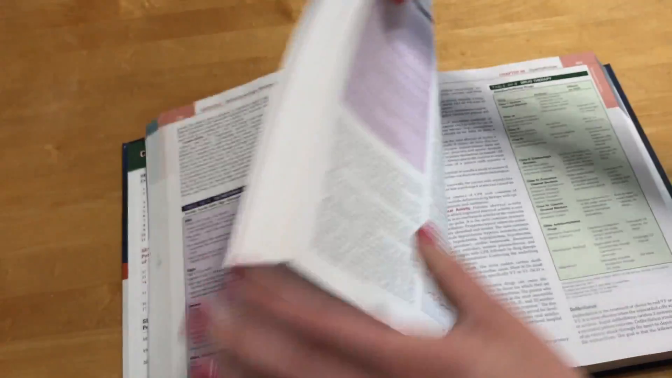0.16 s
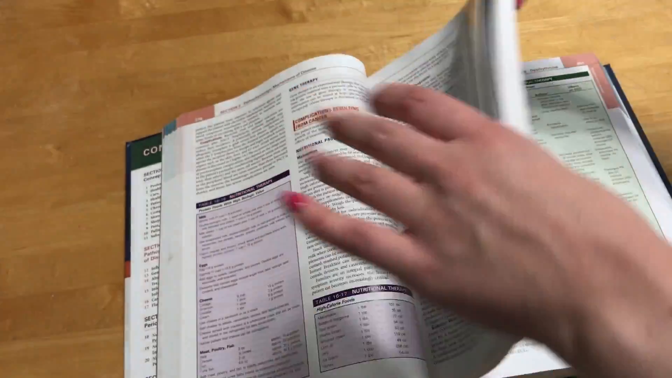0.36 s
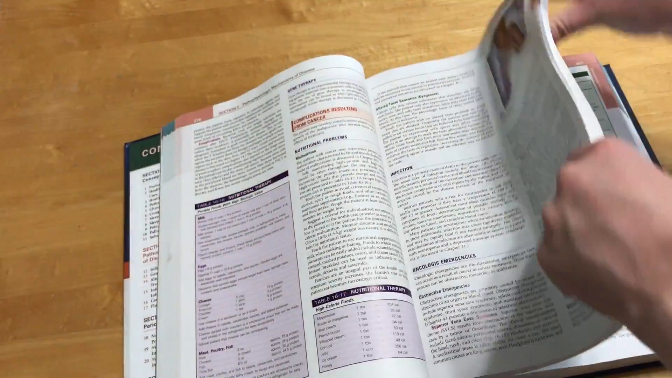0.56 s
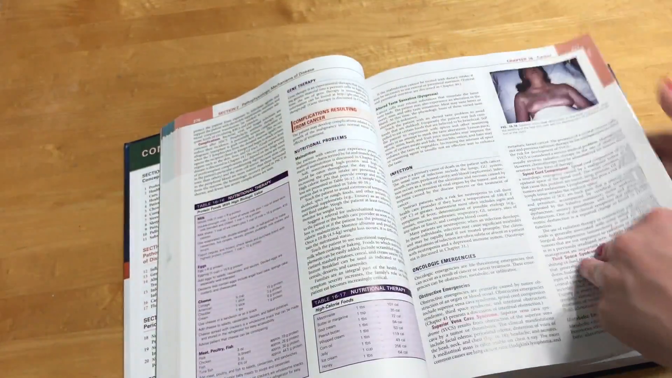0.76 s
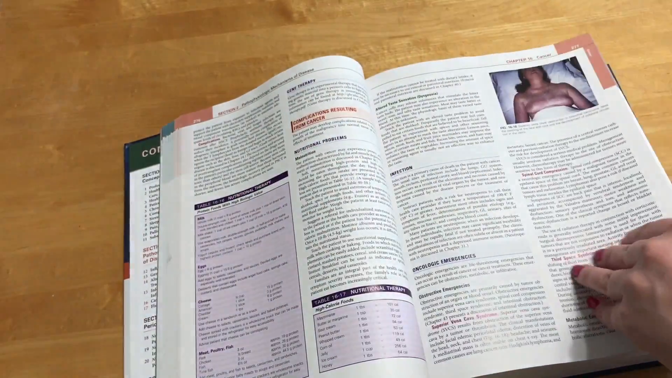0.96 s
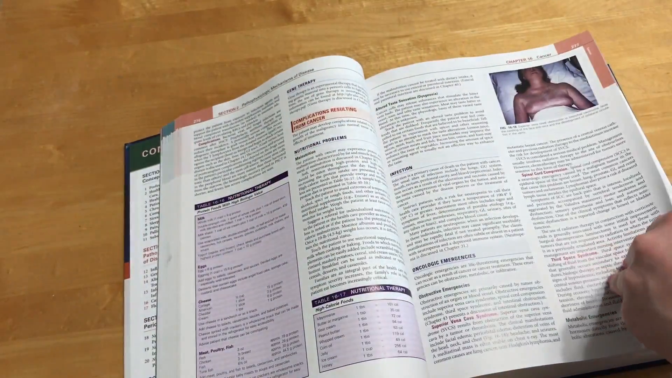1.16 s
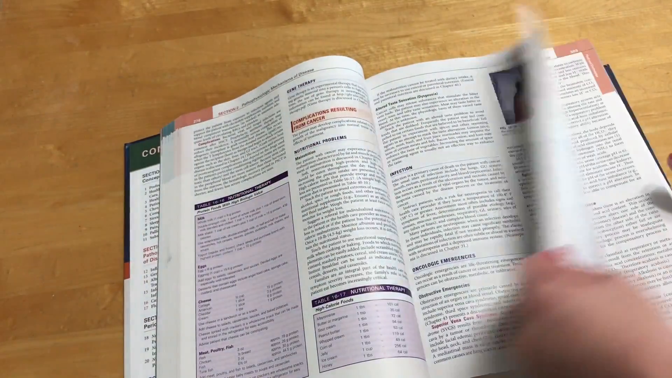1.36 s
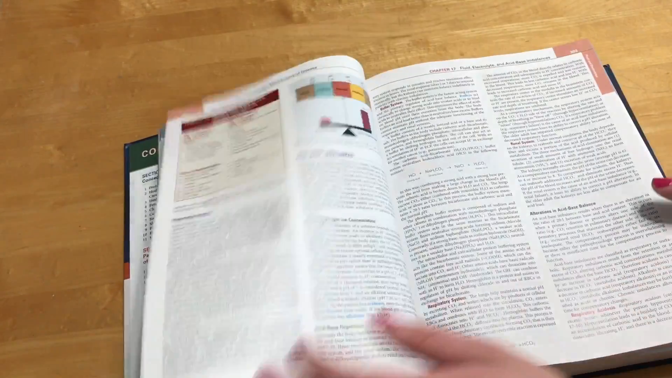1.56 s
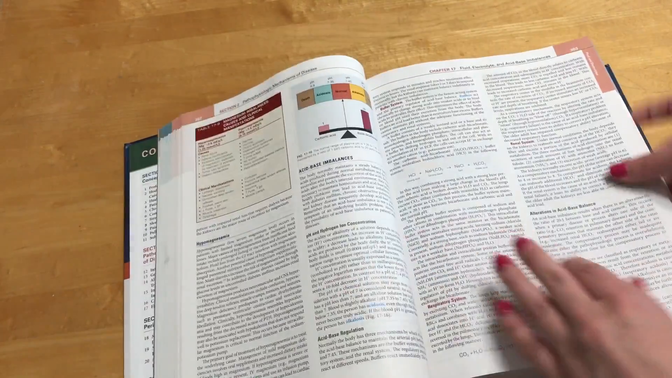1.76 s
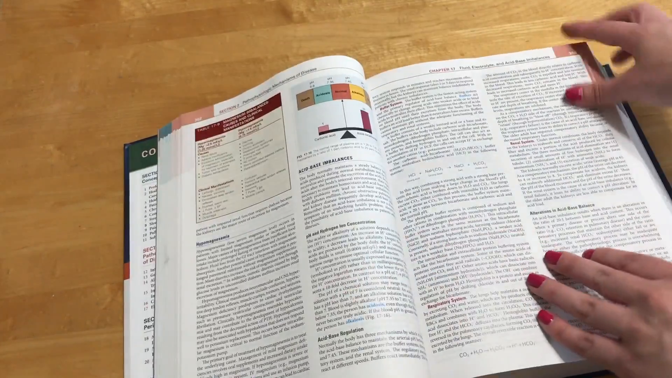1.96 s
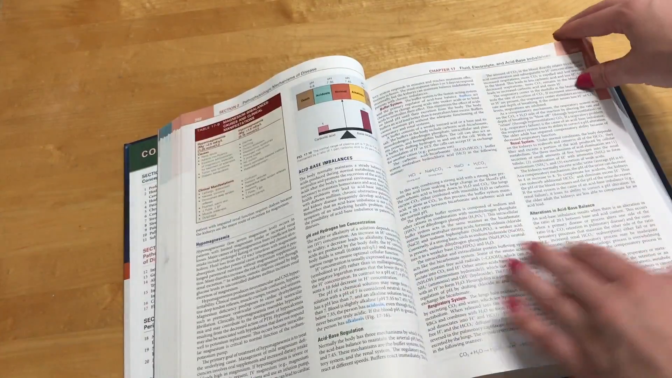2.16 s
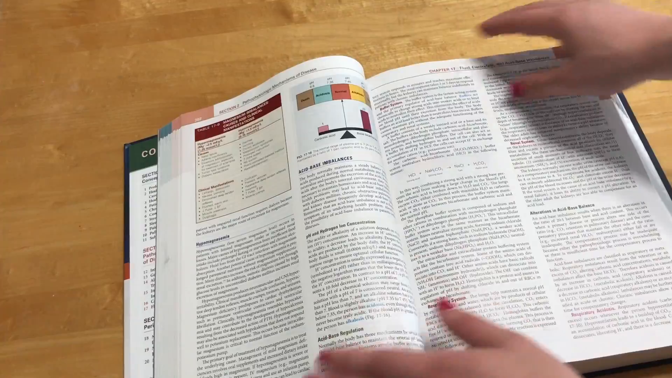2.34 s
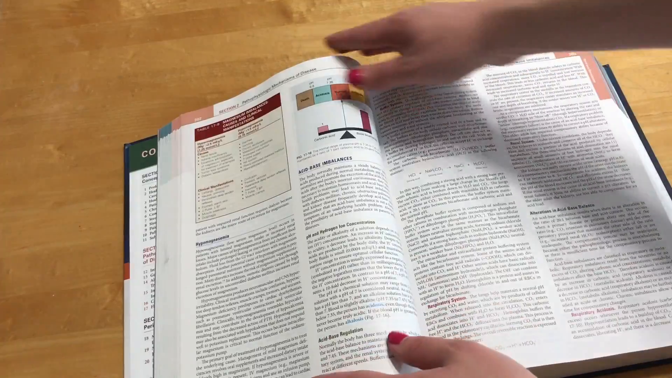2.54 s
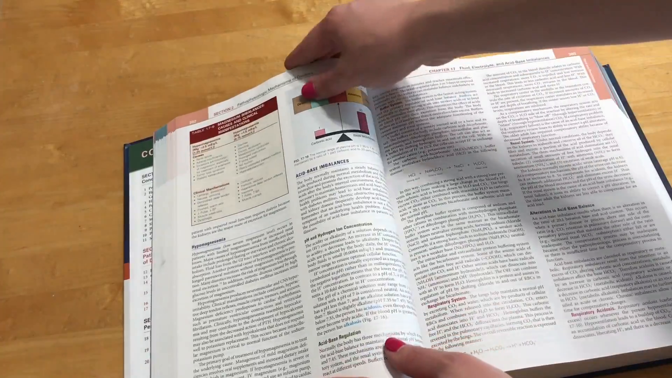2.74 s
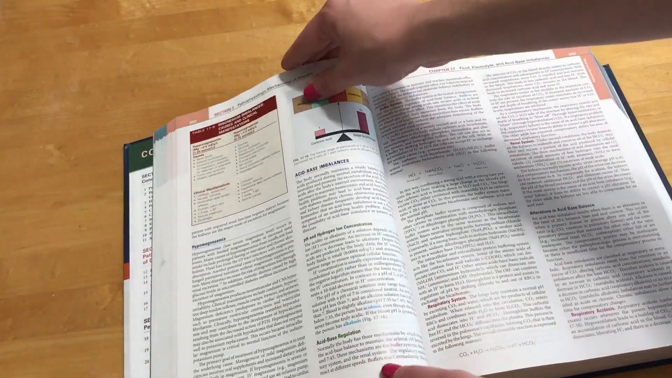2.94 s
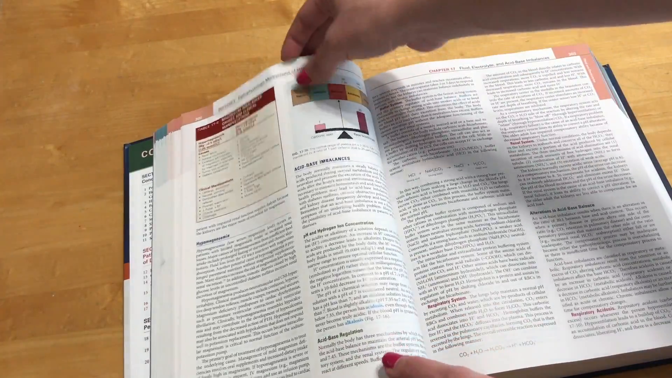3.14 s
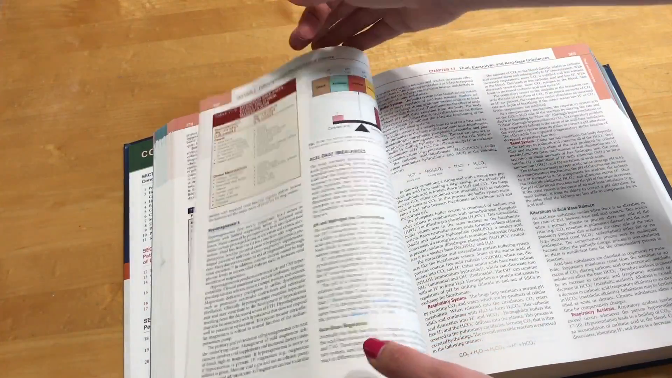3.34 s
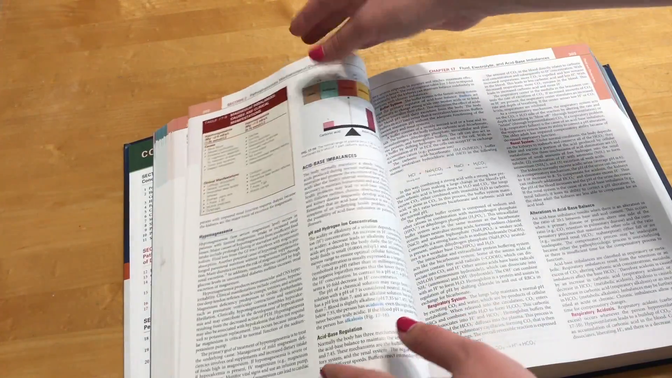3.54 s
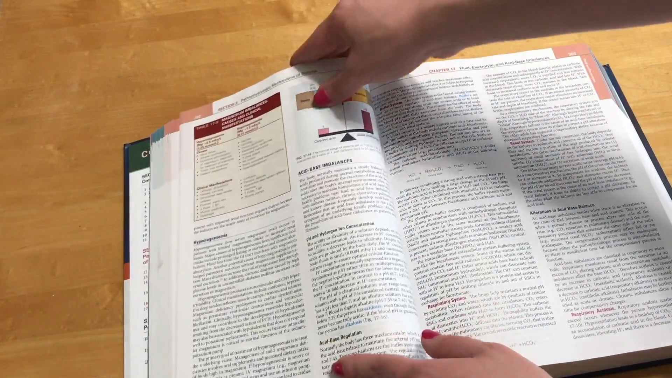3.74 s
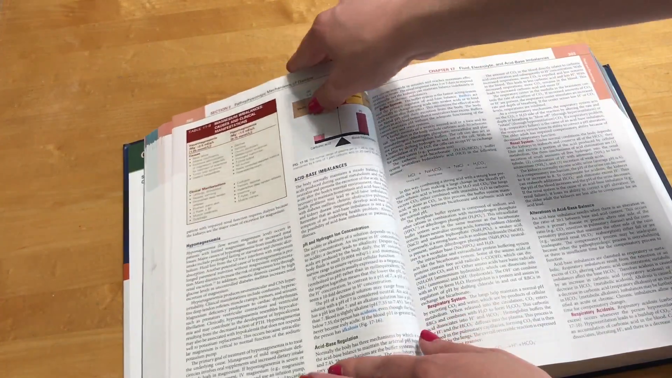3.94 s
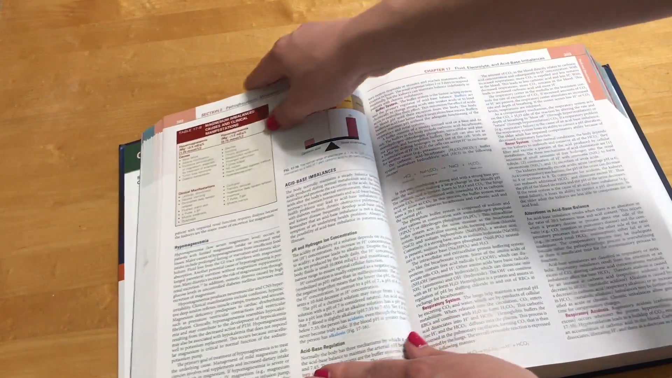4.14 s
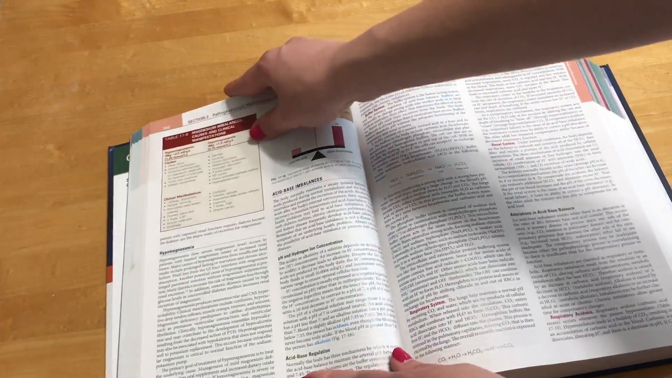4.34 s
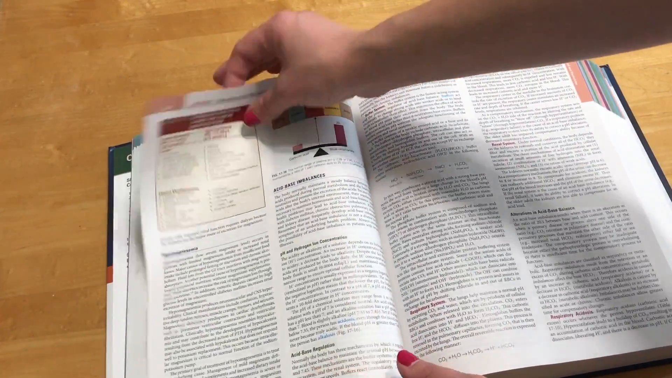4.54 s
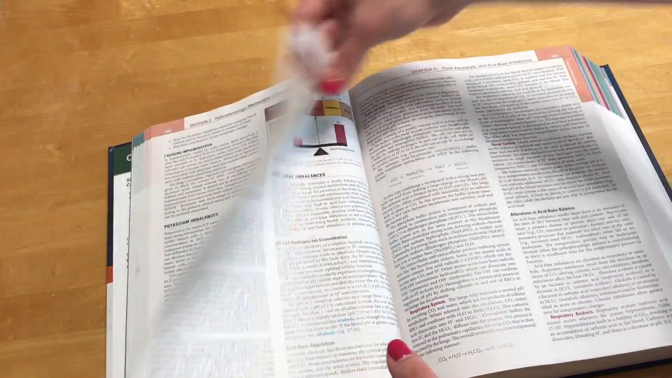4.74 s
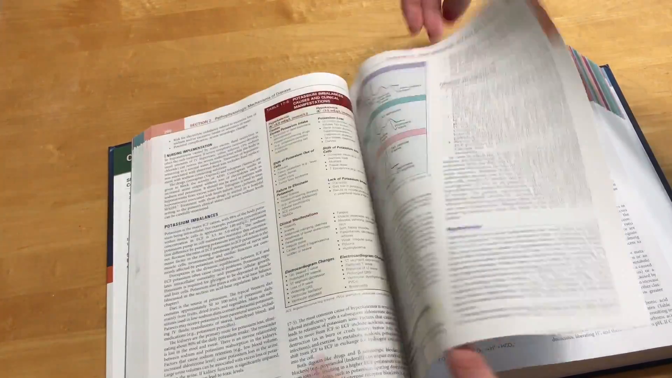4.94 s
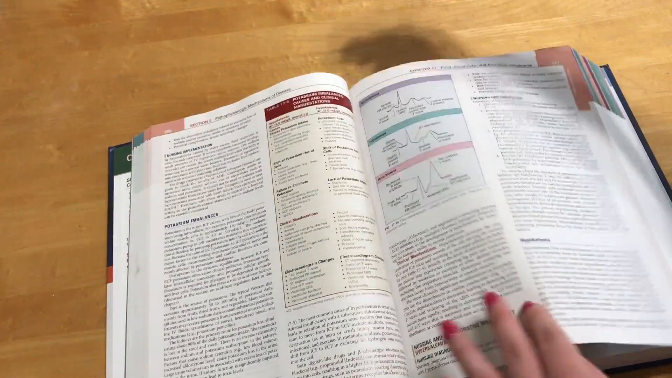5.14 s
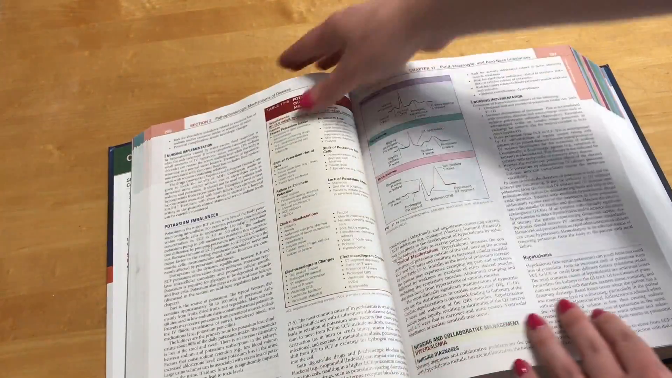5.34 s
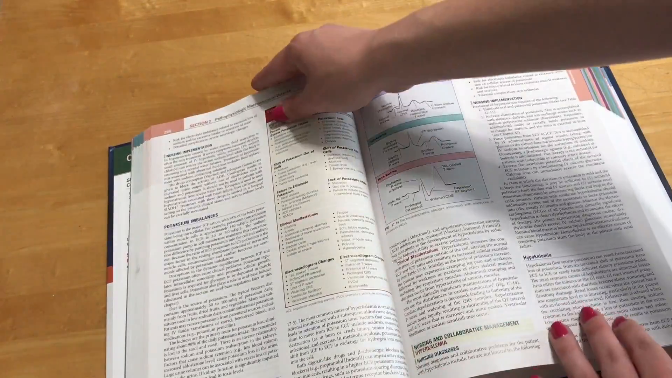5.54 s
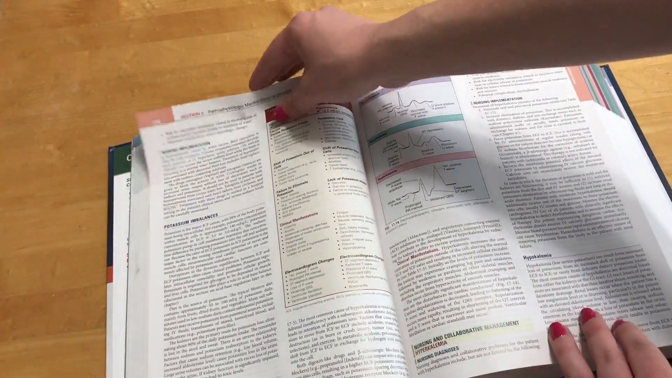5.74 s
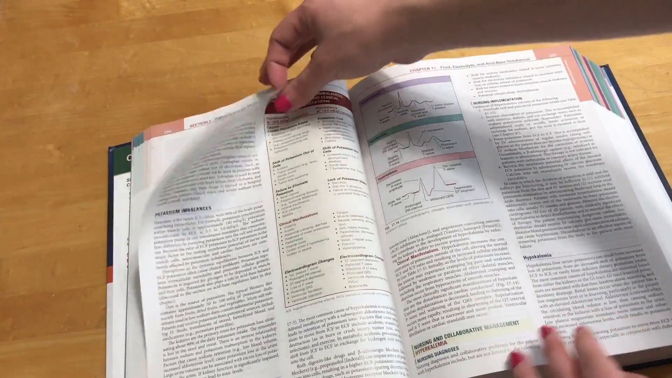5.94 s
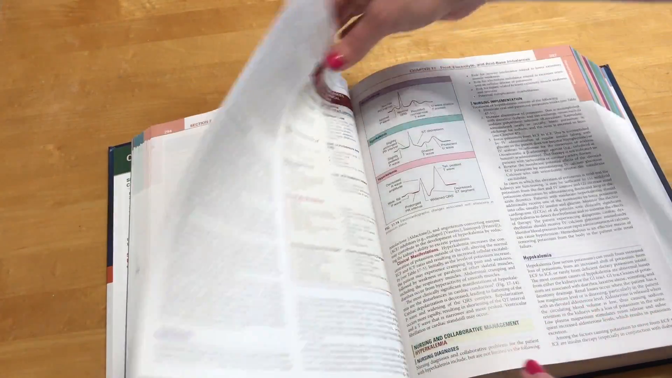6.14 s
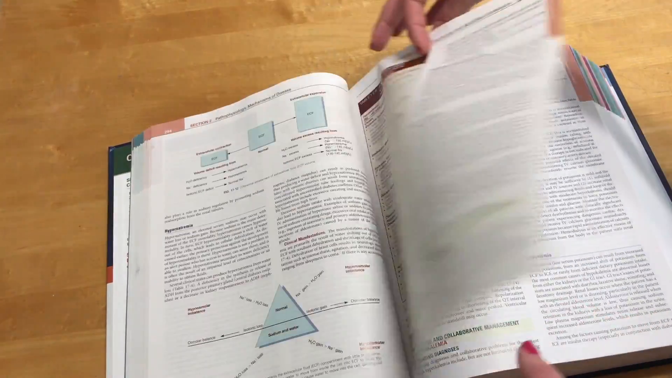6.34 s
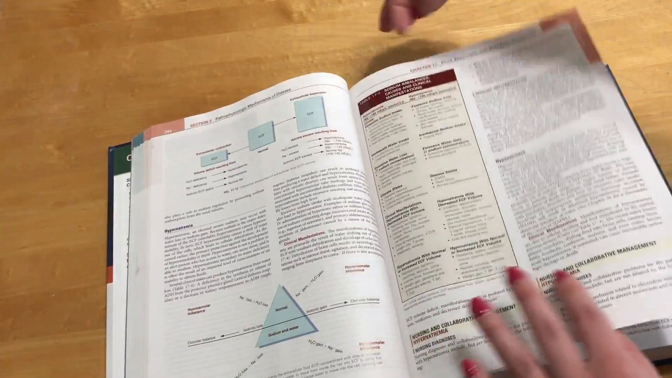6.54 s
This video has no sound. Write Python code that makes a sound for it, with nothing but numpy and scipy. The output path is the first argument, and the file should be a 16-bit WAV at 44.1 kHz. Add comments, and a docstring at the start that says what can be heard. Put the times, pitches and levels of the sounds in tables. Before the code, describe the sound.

Thick book leafed through up close: one hard papery slap, faint finger rubbing, then sharp page snaps and flutters over low room hum.

```python
"""Leafing through a thick textbook

A thick textbook lies on a wooden table in a quiet room. A block of pages drops open with a thud: filtered
noise bursts over ringing modes. Single leaves snap and flap down, each buckle a short noise burst coloured
as paper. Fingers tap, rub and slide over the paper: soft bursts, swelling noise and faint whistles.
The room adds a rumble, a wavering hum and diffuse echoes.
"""
import sys
import numpy as np
from scipy import signal
from scipy.fft import rfft, irfft
from scipy.io import wavfile
from scipy.ndimage import uniform_filter1d

SR = 44100
rng = np.random.default_rng(int(sys.argv[2]) if len(sys.argv) > 2 else 0)


def master(y):
    """Save y as 16-bit WAV."""
    cut = np.clip(np.atleast_2d(y).T, -1, 1)
    pcm = np.round(cut * 32767)  # scale
    wavfile.write(sys.argv[1], SR, pcm.astype(np.int16))


N = 295320
TIME = np.arange(N) / SR

# Blows of the page block as it lands and settles:
# start_s, level_db (relative, the slap has its own trim), decay_s
BLOCK_BLOWS = [(0.0927, -21, 0.0017), (0.0942, -2, 0.0029), (0.0990, -8, 0.00091), (0.111, -10.5, 0.012),
               (0.125, -17.5, 0.0087), (0.134, -12, 0.031)]
# Paper slides under a finger or over paper:
# loudest_s, length_s, level_db, treble_slope_db_per_octave (its brightness)
PAPER_STROKES = [ (0.013, 0.35, -62, -12), (0.45, 0.42, -67.5, -1), (0.666, 0.1, -61.5, -1.5),
                 (0.846, .13, -59.5, -1.5), (0.88, 0.42, -74, 6), (1.115, 0.092, -70.5, -1),
                 (1.281, 0.13, -71.5, -6), (1.45, .28, -67.5, -7), (1.916, 0.46, -70, 24),
                 (2.908, 0.39, -67.5, -4), (3.328, .22, -68.5, -4.5), (3.452, 0.055, -54.5, -17.5),
                 (3.56, 0.29, -71, -2.5), (3.85, 0.22, -71, -3.5), (4.20, .29, -64.5, 1),
                 (4.386, .06, -68, 2), (4.656, 0.45, -69, -6), (5.002, .14, -56, -4),
                 (5.119, .28, -51.5, -14), (5.239, .36, -64.5, -4), (5.383, 0.16, -58.5, -8),
                 (5.708, 0.43, -65.5, -4), (5.931, 0.15, -63.5, -3.5), (6.12, 0.17, -56.5, -4.5),
                 (6.21, .16, -56, -10.5), (6.384, 0.86, -68, -1), (6.55, .26, -53.5, -13.5)]


def from_db(db):
    """Turn decibels into an amplitude factor."""
    return 10 ** (np.asarray(db) / 20)


def rms_one(x):
    """Scale a signal to rms 1."""
    return x / np.sqrt(np.mean(x ** 2) + 1e-20)


def bins(size):
    """Frequencies in Hz of a spectrum of that many samples, at least 1 Hz."""
    return np.maximum(np.arange(size // 2 + 1) * SR / size, 1)


def at_hz(points, hz):
    """Read a table on a log-frequency axis."""
    table_hz, values = np.array(points).T
    return np.interp(np.log(hz), np.log(table_hz), values)


def add(out, start_s, x):
    """Mix x into out at a time."""
    start = int(round(start_s * SR))
    out[start:start + len(x)] += x[:N - start]


def coloured(x, spectrum):
    """Give a steady sound its spectrum, at rms 1."""
    return rms_one(irfft(rfft(x) * from_db(at_hz(spectrum, bins(N))), N))


def drift(rate_hz):
    """Slow random wandering, spread 1."""
    return rms_one(irfft(rfft(rng.standard_normal(N)) / (1 + (bins(N) / rate_hz) ** 2), N))


def burst(colour_db, decay_s, grain_hz):
    """A dying cluster of tiny impacts through a causal filter; as much energy as 5 ms at rms 1."""
    size = 2 * (len(colour_db) - 1)
    dying_noise = rng.standard_normal(size) * np.exp(-TIME[:size] / max(decay_s, 1e-4))
    impacts = rfft(dying_noise)
    # Even out the noise's own spectrum, averaged over grain_hz, so the wanted colour prevails
    spread = uniform_filter1d(abs(impacts) ** 2, max(int(grain_hz * size / SR), 1))
    cepstrum = irfft(np.log(from_db(colour_db) / np.sqrt(spread + 1e-12)))
    # Minimum phase: nothing sounds before the blow
    cepstrum[1:size // 2] *= 2
    cepstrum[size // 2 + 1:] = 0
    x = irfft(impacts * np.exp(rfft(cepstrum)))
    return x * np.sqrt(.005 * SR / np.sum(x ** 2))


def paper_colour(hz, peak_hz, slope_db, bass_slope_db, ripple_db, knee_octaves=0.28):
    """A hill set by the sharpness of the contact; each new bend of the sheet shifts its resonances."""
    # Colour shared by all the paper: pitch_hz, level_db
    leaf_colour = [(200, 1), (600, -2), (1000, 2.5), (1600, 3), (2200, 1.5), (3300, 5.5), (4700, 2.5),
                   (5800, 6.5), (7600, 2), (9000, 4.5), (10200, 0.5), (14000, 5), (16000, -2.5)]
    octaves_below = np.minimum(np.log2(hz / peak_hz) + knee_octaves, 0)
    below = np.maximum(bass_slope_db * octaves_below, -22)
    above = slope_db * np.log2(1 + (hz / peak_hz) ** 4) / 4
    knots = np.linspace(0, np.sqrt(SR / 2), 110)   # evenly spaced on a square-root axis
    ripple = ripple_db * np.interp(np.sqrt(hz), knots, rng.standard_normal(len(knots)))
    return at_hz(leaf_colour, hz) + below + above + ripple


def contacts(rows, bass_slope_db, ripple_db, grain_hz, graze_db):
    """Short blows on paper, each with a colour of its own; the paper grazes just before it gives way."""
    out, hz = np.zeros(N), bins(size=8192)
    for start_s, level_db, peak_hz, slope_db, decay_s in rows:
        colour_db = paper_colour(hz, peak_hz, slope_db, bass_slope_db, ripple_db)
        graze = burst(colour_db, .006, grain_hz)[:SR // 50][::-1]   # reversed: 20 ms of swelling
        add(out, start_s - len(graze) / SR, from_db(level_db + graze_db) * graze)
        add(out, start_s, from_db(level_db) * burst(colour_db, decay_s, grain_hz))
    return out


def room_tone(air_level_db=-59.5, waver=1.0):
    """Ventilation rumble as coloured noise, with a few hum lines of wavering phase (waver in radians)."""
    # Rumble spectrum: pitch_hz, relative level_db per Hz
    air_spectrum = [(20, -35), (30, -14), (45, 1.5), (60, -3), (78, -4), (120, -1.5), (160, -4), (240, -5),
                    (620, -17), (1050, -17.5), (1300, -22.5), (4900, -36), (10400, -40), (16000, -43)]
    # Hum lines: pitch_hz, level_db (rms)
    hum_lines = [(58, -64), (97.4, -66), (194, -67.5), (238, -80)]
    hum = np.zeros(N)
    for hz, level_db in hum_lines:
        phase = 2 * np.pi * hz * TIME + waver * drift(rate_hz=4)
        hum += from_db(level_db) * np.sqrt(2) * np.sin(phase)
    return hum + from_db(air_level_db) * coloured(rng.standard_normal(N), air_spectrum)


def room(x, first_echo_s=0.0015, build_s=0.0024, dull_hz=9000):
    """Diffuse echoes, dense and even in colour, with a decay time of their own in each band."""
    # Time to die by 60 dB: pitch_hz, t60_s
    echo_decay = [(100, .55), (450, 0.69), (1500, 0.66), (5000, 0.64), (9000, 0.32), (16000, 0.41)]
    t, hz, tail = TIME[:SR], bins(SR), np.zeros(SR)
    edges = np.geomspace(60, 18000, 11)
    for low, high in zip(edges, edges[1:]):
        band_filter = signal.butter(2, [low, high], "band", fs=SR, output="sos")
        band = signal.sosfilt(band_filter, rng.standard_normal(SR))
        t60_s = at_hz(echo_decay, np.sqrt(low * high))
        tail += band * np.exp(-np.log(1000) * t / t60_s)
    spectrum = rfft(tail)
    unevenness = np.sqrt(uniform_filter1d(abs(spectrum) ** 2, size=90) + 1e-3)
    tail = irfft(spectrum / unevenness / np.hypot(1, hz / dull_hz), SR)
    tail *= np.clip((t - first_echo_s) / build_s, 0, 1)
    tail = tail[:SR * 3 // 4]
    return signal.fftconvolve(x, tail / np.sqrt(np.sum(tail ** 2)))[:N]


def whistle(tone_width_hz=8.9, rush_width_hz=380.0):
    """A faint sliding whistle: noise in a broad sinking resonance, out of which a thin tone rises briefly."""
    # start_s, rush_rise_s, rush_settles_hz, rush_level_db, tone_pitch_hz, tone_level_db
    whistle_slides = [(2.325, 0.082, 2804, -66.5, 2860, -61), (2.85, 0.12, 2420, -68.5, 2730, -68.5)]
    tone_delay_s, tone_swell_s, tone_sag_hz_per_s = .225, 0.067, 99
    rush_settle_s, rush_start_sharp = 0.099, .27   # the rush starts this share too high
    out, t = np.zeros(N), TIME[:SR]
    tone_swell = np.exp(-abs(t - tone_delay_s) / tone_swell_s)
    for start_s, rise_s, rush_hz, rush_db, tone_hz, tone_db in whistle_slides:
        rush_swell = t / rise_s * np.exp(1 - t / rise_s)
        rush_glide = rush_hz * (1 + rush_start_sharp * np.exp(-t / rush_settle_s))
        tone_glide = tone_hz - tone_sag_hz_per_s * (t - tone_delay_s)
        rush = rush_glide, from_db(rush_db) * rush_swell, rush_width_hz
        tone = tone_glide, from_db(tone_db) * tone_swell, tone_width_hz
        for hz, gain, width_hz in (rush, tone):
            phase = 2 * np.pi * np.cumsum(hz) / SR
            # Two independent drifts on cosine and sine make a narrow band of noise
            in_phase = drift(width_hz)[:SR] * np.cos(phase)
            quadrature = drift(width_hz)[:SR] * np.sin(phase)
            add(out, start_s, gain * (in_phase + quadrature))
    return out


def stroke_hz(slope_db):
    """A brighter stroke also peaks higher: 5100 Hz at slope 0, an octave per 8.5 dB of slope."""
    return 5100 * 2 ** (slope_db / 8.5)


def rubbing(catches_per_s=220, grain_share=0.75, flutter_db=1.56, bass_slope_db=2.5, ripple_db=-0.4,
            roundness=0.72, rise_share=0.56):
    """Paper fibres catch and let go: small clicks on a smooth rush that swells and fades with each stroke."""
    out, t, hz = np.zeros(N), TIME[:SR], bins(SR)
    for loudest_s, length_s, level_db, slope_db in PAPER_STROKES:
        start_s = max(loudest_s - rise_share * length_s, 0)   # rise_share: part spent speeding up
        end_s = loudest_s + (1 - rise_share) * length_s
        catches = (rng.random(SR) < catches_per_s / SR) * rng.standard_normal(SR)
        fibres = rng.standard_normal(SR) + grain_share * rms_one(catches)
        colour_db = paper_colour(hz, stroke_hz(slope_db), slope_db, bass_slope_db, ripple_db)
        rush = irfft(rfft(fibres) * from_db(colour_db), SR)
        speed = np.interp(start_s + t, [start_s, loudest_s, end_s], [0, 1, 0])
        add(out, start_s, from_db(level_db) * rms_one(rush) * speed ** roundness)
    return out * from_db(flutter_db * drift(rate_hz=25))   # uneven pressure


def ticks(ticks_per_s=5.0, over_stroke_db=0.5, decay_s=.002):
    """A sliding finger snags by chance around mid-stroke; loudness and brightness follow the stroke."""
    rows = []
    for loudest_s, length_s, level_db, slope_db in PAPER_STROKES:
        draws = rng.random(size=(6, 2))
        for chance, place in draws:
            if chance < ticks_per_s * length_s / len(draws):
                tick_s = loudest_s + (place - .5) * length_s / 2
                rows.append((tick_s, level_db + over_stroke_db, stroke_hz(slope_db), slope_db, decay_s))
    first_blow_s = BLOCK_BLOWS[0][0]
    return [row for row in rows if first_blow_s < row[0] < N / SR]


def finger_taps(treble_slope_db=-16.0):
    """Fingers or leaves land on the book: soft contacts whose treble falls steeply per octave."""
    # start_s, level_db, strongest_hz, decay_s
    tap_events = [(0.109, -33, 70, 0.041), (0.7094, -49.5, 887, 0.0015), (0.8188, -49, 400, 0.0036),
                  (0.8720, -43, 570, 0.0075), (0.9040, -50.5, 964, .003), (1.5400, -42, 754, 0.0028),
                  (1.5783, -41, 725, .013), (1.6374, -30, 824, 0.013), (2.0200, -41, 414, 0.0046),
                  (2.0300, -41, 150, 0.042), (3.3430, -48.5, 1180, 0.0019), (3.434, -48, 1026, 0.0074),
                  (4.7461, -47.5, 1290, 0.00078), (5.619, -53, 1376, 0.006)]
    rows = [(s, level_db, hz, treble_slope_db, decay_s) for s, level_db, hz, decay_s in tap_events]
    return contacts(rows, bass_slope_db=6.5, ripple_db=5.0, grain_hz=305.3, graze_db=-19.5)


def flurries(gap_s=.012, decay_s=.009, scatter_db=1.5):
    """A bent leaf swings over and settles in a quick uneven run of buckles that tend to weaken and dull."""
    # start_s, length_s, first_level_db, strongest_hz, treble_slope_db_per_octave
    flurry_runs = [(0.545, 0.026, -51, 1490, -12), (1.583, 0.044, -30.5, 1480, -14.5),
                   (1.6405, .095, -27, 1570, -8.5), (4.79, .03, -48.5, 1400, -15.5),
                   (4.9826, .018, -33, 1980, -21), (5.0183, 0.044, -33, 2130, -20.5),
                   (5.0856, 0.021, -36, 2250, -27), (5.111, 0.068, -37.5, 1800, -20),
                   (6.5736, .02, -41.5, 2150, -20), (6.673, 0.015, -46.5, 2050, -16)]
    # Change over the whole run: level, pitch, treble slope per octave
    fade_db, sink_octaves, dulling_db = 11.5, .1, 3.5
    rows = []
    for start_s, length_s, level_db, peak_hz, slope_db in flurry_runs:
        slips, sizes = rng.uniform(-.3, .3, size=24), rng.standard_normal(size=24)
        for k, (slip, size) in enumerate(zip(slips, sizes)):
            after_s = gap_s * (k + slip * (k > 0))   # the first buckle is on time
            done = after_s / length_s
            if done < 1:
                buckle_db = level_db - fade_db * done + scatter_db * size
                buckle_hz = peak_hz / 2 ** (sink_octaves * done)
                rows.append((start_s + after_s, buckle_db, buckle_hz, slope_db - dulling_db * done, decay_s))
    return [row for row in rows if row[0] < N / SR]


def leaf_snaps():
    """Leaves buckle or slap down as crisp blows, joined by the flurries and the finger ticks."""
    # start_s, level_db, strongest_hz, treble_slope_db_per_octave, decay_s
    snap_events = [ (0.8180, -52, 3056, -15, 0.0044), (1.5780, -33, 1690, -13.5, 0.0022),
                   (1.5935, -25, 2850, -17, 0.0042), (1.6357, -24.5, 4880, -13, 0.0031),
                   (1.6990, -35.5, 1870, -13, .015), (2.2830, -55.5, 4540, -4, .008),
                   (2.8210, -54.5, 2500, -5, 0.0019), (2.9245, -55.5, 4050, 0, 0.0022),
                   (2.9585, -58, 3000, -4, .0013), (3.3425, -42, 3800, -3, 0.0011),
                   (3.9270, -56.5, 2490, -9.5, 0.0041), (3.9963, -49.5, 4000, 2, .001),
                   (4.5745, -39, 3780, -14.5, 0.0024), (4.7005, -45.5, 1560, -7.5, 0.0024),
                   (4.9855, -30, 2200, -10, 0.0096), (5.0447, -34, 2100, -18, 0.0035),
                   (5.1175, -35, 2830, -18.5, 0.0015), (5.4095, -50, 4170, -15.5, .002),
                   (5.8495, -35.5, 3900, -18.5, 0.0026), (6.1010, -45, 1800, -19, 0.0037),
                   (6.1206, -46.5, 3000, -7.5, 0.0011), (6.2597, -24.5, 3050, -10.5, 0.00047),
                   (6.6895, -41.5, 2970, -22, 0.0025)]
    rows = snap_events + flurries() + ticks()
    return contacts(rows, bass_slope_db=7.0, ripple_db=2.5, grain_hz=500, graze_db=-20.5)


def book_ring(ring_db=-1.5):
    """The main blow sets book and table ringing; neighbouring modes swing in opposite directions."""
    # Decaying modes: pitch_hz, level_db (before the ring_db trim), t60_s
    ring_modes = [(151.3, -44.5, 0.52), (221, -32.5, 0.19), (291, -33, 0.42), (444, -29, 0.22),
                  (501, -11, .05), (578, -25, .26), (957, -38.5, 0.22), (1158, -27.5, .27), (1210, -22, .3),
                  (1488, -31.5, .17), (1553, -30.5, 0.21), (1724, -27.5, 0.15), (2614, -31, 0.34),
                  (2790, -32.5, .22), (3250, -38.5, .15)]
    out, t = np.zeros(N), TIME[:SR]
    main_blow_s = BLOCK_BLOWS[1][0]
    for k, (hz, level_db, t60_s) in enumerate(ring_modes):
        gain = (-1) ** k * from_db(ring_db + level_db)
        fade = np.exp(-np.log(1000) * t / t60_s)
        add(out, main_blow_s, gain * fade * np.cos(2 * np.pi * hz * t))
    return out


def slap(slap_db=-12.0):
    """The block of pages comes down in a few quick blows that squeeze out air and paper noise."""
    # Spectrum of each blow: pitch_hz, relative level_db per Hz
    slap_colour = [(40, -36.5), (110, -24), (280, -13), (440, 6), (750, -9), (1230, -2), (2100, -10),
                   (3300, -12), (4600, -17), (5600, -15.5), (8500, -28.5), (16000, -38)]
    out = np.zeros(N)
    colour_db = at_hz(slap_colour, bins(size=8192))
    for start_s, level_db, decay_s in BLOCK_BLOWS:
        add(out, start_s, from_db(slap_db + level_db) * burst(colour_db, decay_s, grain_hz=250))
    return out


def scene(block_room_db=-10.5, leaf_room_db=-16.0, tap_room_db=-12.0, rub_room_db=-13.0):
    """Book and hands are close; the room answers slap, leaves, taps and rubbing faintly."""
    background = room_tone() + whistle()
    rubs, taps, leaves, block = rubbing(), finger_taps(), leaf_snaps(), slap()
    to_room = from_db(block_room_db) * block + from_db(leaf_room_db) * leaves
    to_room += from_db(tap_room_db) * taps + from_db(rub_room_db) * rubs
    return (background + room(to_room) + rubs + taps + leaves + book_ring() + block)[None]


def record(dry):
    """The top is cut steeply above 15.9 kHz."""
    low_pass = signal.ellip(10, .1, 80, 15900, fs=SR, output="sos")
    return signal.sosfilt(low_pass, dry)


dry = scene()
out = record(dry)
master(out)
```